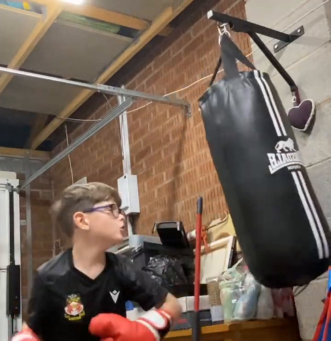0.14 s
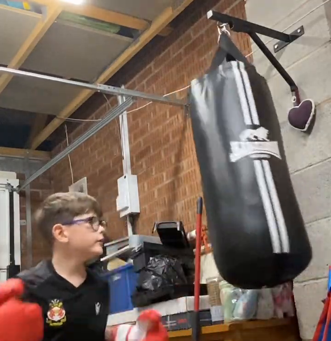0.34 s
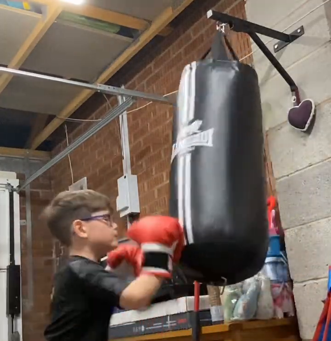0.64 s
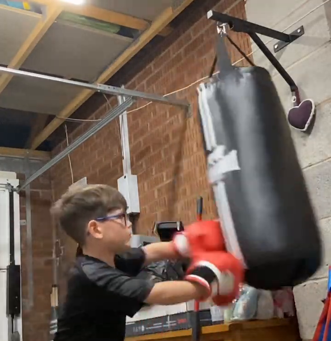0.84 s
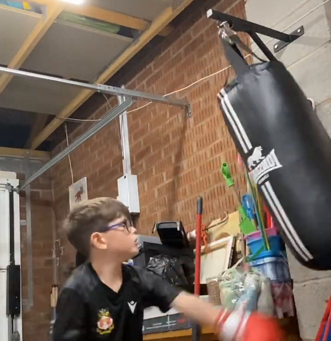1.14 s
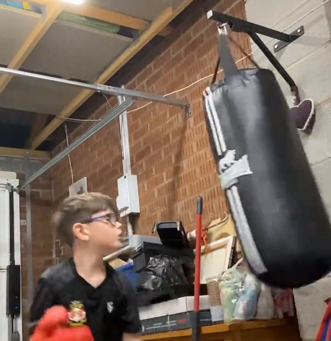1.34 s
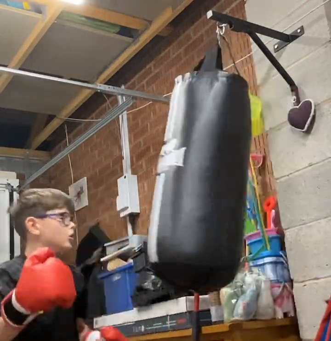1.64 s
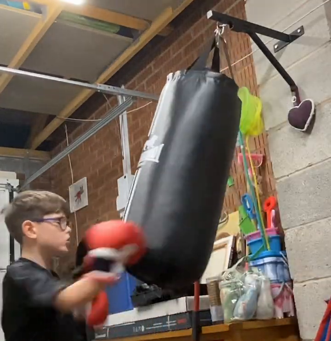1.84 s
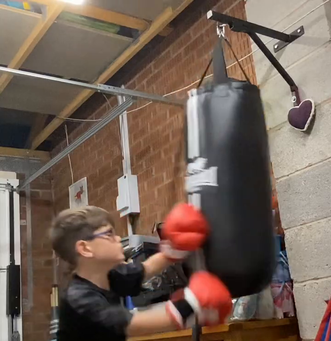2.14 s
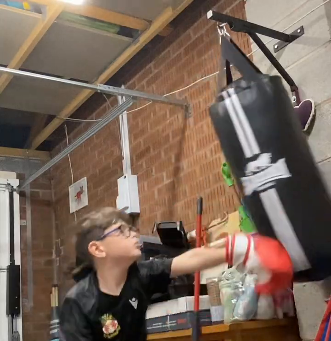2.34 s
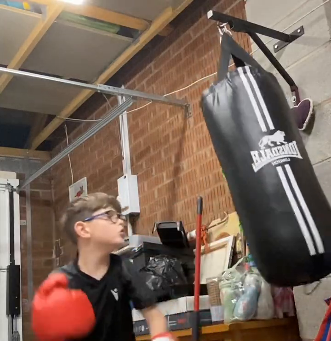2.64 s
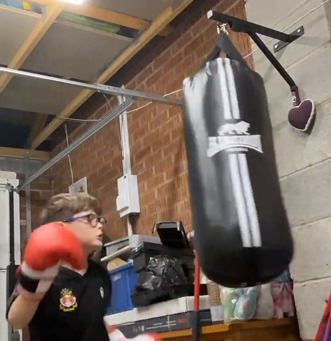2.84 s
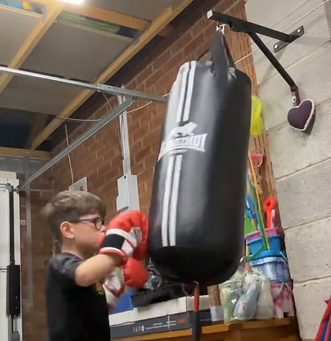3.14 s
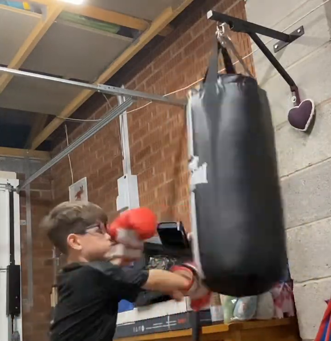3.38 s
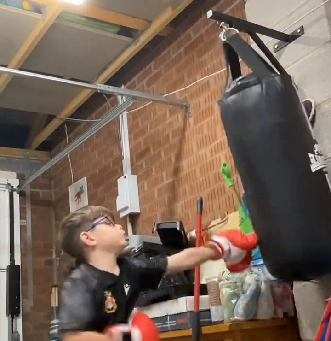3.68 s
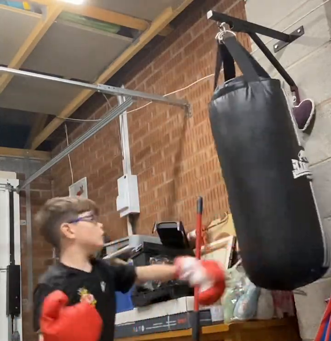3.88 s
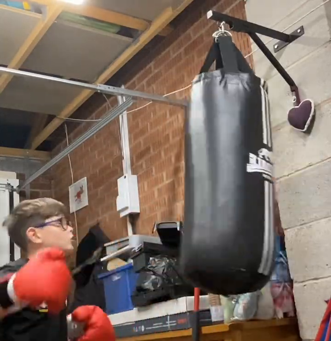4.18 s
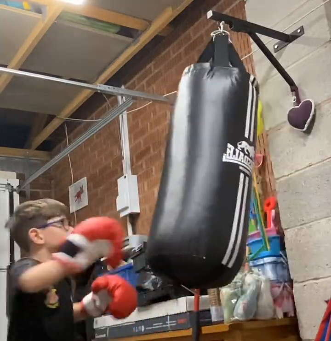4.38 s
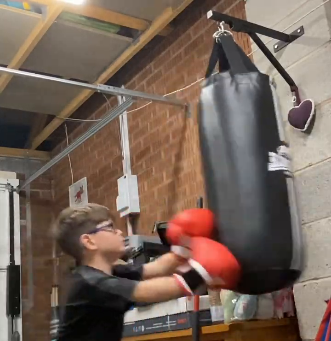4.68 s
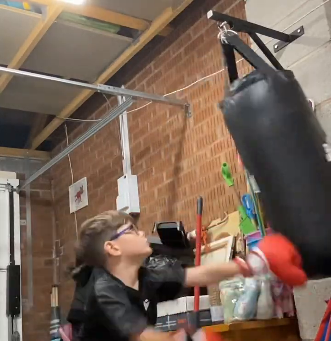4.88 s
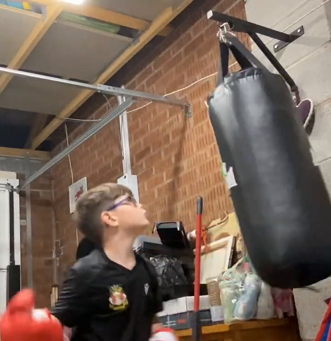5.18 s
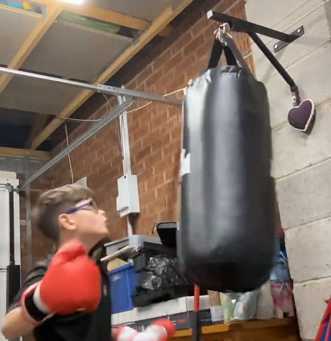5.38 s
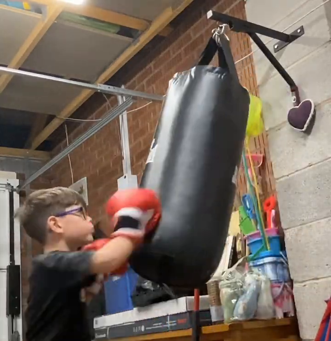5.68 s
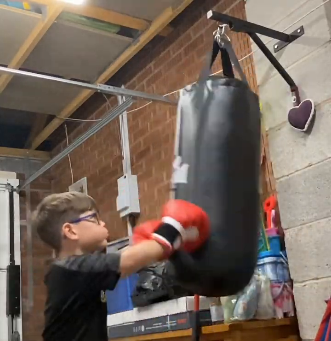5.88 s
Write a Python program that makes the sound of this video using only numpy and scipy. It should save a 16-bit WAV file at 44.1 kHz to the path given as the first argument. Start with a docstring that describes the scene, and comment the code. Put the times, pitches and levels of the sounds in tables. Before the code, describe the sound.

A repeating cycle of about 1.25 seconds: one or two quick glove slaps, a harder padded smack with a short steel squeal, then a loud jangle of rings and a low wall-bracket thump as the bag falls back and rebounds. Between bursts come tiny hook squeaks, sleeve swishes and glove rubs on vinyl. Quiet garage air, lively brick-room echoes, close microphone with little deep bass.

```python
"""A heavy bag hangs in a brick garage and takes quick bursts of gloved punches that slap its cover.
Slaps, thuds and cracks are shaped noise bursts, with damped modes for the knock of the taut cover.
The steel hook squeaks (gliding tones) as the bag swings; its rings jangle (struck modes) when it jumps.
The wall bracket booms (low damped modes) when the weight drops back, and sleeves, gloves and shoes
rustle in between (grainy noise). Dense echoes and quiet air surround it; the microphone sheds deep bass."""
import sys
import numpy as np
from scipy import signal
from scipy.io import wavfile
from scipy.ndimage import uniform_filter1d

SR = 44100
rng = np.random.default_rng(int(sys.argv[2]) if len(sys.argv) > 2 else 0)


def master_out(mix):
    """Clip the mix to full scale and print it as 16-bit PCM to the path in sys.argv[1]."""
    frames = np.transpose(np.atleast_2d(mix))
    ceiling = np.clip(frames, -1, 1)
    pcm = np.round(ceiling * 32767).astype(np.int16)
    wavfile.write(sys.argv[1], SR, pcm)


N = 265482
T = np.arange(SR // 2) / SR  # the life of one blow [s]
# Levels in the event tables come before each layer's own trim; spectra and modes give relative levels.


def amp(db):
    """Decibels to gain."""
    return 10 ** (np.asarray(db) / 20)


def unit(x):
    """Scales to rms 1."""
    return x / np.sqrt(np.mean(x ** 2) + 1e-20)


def crest(x, size=176):
    """Scales a blow so that its loudest 4 ms (size in samples) have rms 1."""
    loudest_power = uniform_filter1d(x ** 2, size, mode="constant").max()
    return x / np.sqrt(loudest_power + 1e-20)


def read(points, hz):
    """Reads a table on a log-frequency axis."""
    table_hz, value = np.transpose(points)
    return np.interp(np.log(hz + 1), np.log(table_hz), value)


def between(first, last, share):
    """Goes from first to last as share goes from 0 to 1, and on beyond."""
    return first + (last - first) * share


def add(mix, s, sound):
    """Mixes a sound in at s seconds."""
    part = mix[max(round(s * SR), 0):][:len(sound)]
    part += sound[:len(part)]


def colour(x, points, tilt_db=0, size=4096):
    """Minimum-phase filter with the given spectrum, tilted around 4 kHz in dB per octave above 500 Hz."""
    hz = abs(np.fft.fftfreq(size, 1 / SR))
    octaves = np.log2(np.maximum(hz, 500) / 4000)
    log_gain = np.log(amp(read(points, hz) + tilt_db * octaves))
    taps = np.fft.ifft(np.exp(np.conj(signal.hilbert(log_gain)))).real
    return signal.fftconvolve(x, taps)[:len(x)]


def wander(count, hz):
    """Straight lines between normal random knots, hz knots a second."""
    knots = rng.standard_normal(count)
    return np.interp(np.arange(count) * hz / SR, np.arange(count), knots)


def ringing(modes, spread):
    """Damped modes, one a row, each a little detuned by the load of the moment."""
    hz, db, t60 = np.transpose(modes)[:, :, None]
    hz = hz * (1 + spread * rng.standard_normal(hz.shape))
    t = T[:len(T) * 2 // 3]
    return amp(db - 60 * t / t60) * np.sin(2 * np.pi * hz * t)


# spectrum of the quiet garage air: (frequency [Hz], level [dB])
AIR_SPECTRUM = [(25, -41.5), (50, 2), (95, 7.5), (160, 2), (400, -1), (800, -5), (1600, -10), (4000, -16.5),
                (7000, -18.5), (10000, -26), (16000, -41)]


def garage_air(level_db=-56):
    """The quiet air of the garage: steady coloured noise."""
    return amp(level_db) * unit(colour(rng.standard_normal(N), AIR_SPECTRUM))


# hard punches lifting the bag: (time [s], rings level [dB], time to go slack [s], squeal length [s],
# squeal level [dB], mean pitch [Hz], glide [Hz], overtones re the tone [dB], lead-in [s])
LIFTS = [(1.057, -22, 0.055, 0.035, -23.5, 1959, -16, -2, 0.066),
         (2.389, -26.5, 0.04, 0.023, -28, 2004, 25, -25, 0.021),
         (3.645, -23, .048, 0.0204, -21.5, 1910, 337, -9, 0.028),
         (4.895, -21.5, 0.049, 0.036, -18.5, 1977, -32, -3.5, 0.071)]
# the bag dropping back on its straps: (time [s], clash level [dB], clash decay [s], gathering level [dB],
# boom level [dB], boom lag [s], bounce time [s], rebound level [dB])
DROPS = [(0.001, -37, 0.011, -54, -39, 0.0044, 0.13, -52), (1.211, -21.5, 0.014, -29, -36, .012, .124, -31),
         (2.516, -28, 0.0051, -32.5, -30, .006, .109, -34), (3.755, -25, 0.022, -35, -30.5, .031, .12, -55),
         (5.045, -14.5, .012, -27, -24.5, 0.019, .132, -35.5)]


def clashes():
    """Rings shiver and slacken on a lift; gather, clash, rebound on a drop: (s, dB, decay s, dB/octave)."""
    for s, db, slack, length, squeal_db, *tone in LIFTS:
        yield s + 0.008, squeal_db - 6.5, 0.022, -4.5  # shiver during the squeal
        yield s + slack, db, 0.013, -3.5  # the straps go slack and the rings clash
    for s, db, decay, gather_db, boom_db, lag, bounce, rebound_db in DROPS:
        yield s - 0.029, gather_db, 0.021, -6  # the rings draw together just before the drop
        yield s, db, decay, -6
        yield s + 0.64 * bounce, rebound_db - 1, 0.0098, -6  # first rebound
        yield s + bounce, rebound_db, 0.0098, -6


# ringing of the rings and hook: (frequency [Hz], level [dB], t60 [s])
STEEL_MODES = [(2967, -16.5, 0.42), (3550, -1, 0.065), (4100, -24.5, .12), (4820, -16.5, 0.089),
               (5400, -10, 0.32), (5900, -16, 0.1), (6100, -12, 0.14), (6100, -23, .13),
               (6280, -6.5, 0.071), (6940, -5, 0.16), (7040, -9, 0.027), (6760, 1.5, 0.096),
               (7500, -16.5, 0.13), (7530, 0, 0.085), (8530, -10.5, 0.12), (9000, -22.5, 0.067),
               (9400, -0.5, 0.084), (8900, -2, 0.093), (10500, -2.5, 0.07), (10650, -14, 0.029),
               (13600, -30.5, .06)]
# spectrum of the bare steel contacts: (frequency [Hz], level [dB])
CLASH_SPECTRUM = [(200, -25.5), (1000, -19), (2200, -14.5), (3500, -11), (4700, -11), (6500, 7), (9000, -3),
                  (12000, 2.5), (16000, -7)]


def jangles(level_db=-2, ring_db=-5, contacts_per_s=1300, scrape=.14, rise_share=0.27):
    """Each clash is a run of steel contacts; the weights of the modes they ring change at each clash."""
    out = np.zeros(N)
    for s, level, decay, tilt in clashes():
        hits = rng.random(len(T)) < contacts_per_s / SR
        contacts = rng.standard_normal(len(T)) * (scrape + hits)
        contacts *= np.exp(-T / decay) * (1 - np.exp(-T / (rise_share * decay)))
        weights = rng.choice([-1, 1], len(STEEL_MODES)) * rng.uniform(0.336, 1, len(STEEL_MODES))
        ring = signal.fftconvolve(contacts, weights @ ringing(STEEL_MODES, spread=0.0035))[:len(T)]
        clatter = crest(colour(contacts, CLASH_SPECTRUM, tilt))
        add(out, s, amp(level + level_db) * crest(clatter + amp(ring_db) * crest(ring)))
    return out


# gloves landing: (time [s], slap level [dB], follow-through [0 flick, about 1 full; more is deeper],
# squareness of the first contact [0-1])
PUNCHES = [(0.598, -30.5, 0.1, 0.85), (0.752, -42.5, 0.3, 0.17), (1.046, -29.5, .95, 0.13),
           (1.851, -39.5, 0.3, 0), (2.090, -36.5, 0.1, 0.12), (2.359, -30.5, 0.85, 0.06),
           (3.0931, -43.5, 0.04, 0.65), (3.489, -48.5, 1.17, 0.3), (3.505, -38.5, 0, 0.11),
           (3.627, -28.5, 0.81, 0), (4.43, -35.5, 0.36, 0.7), (4.882, -28, .85, 0.16),
           (5.664, -39, 0.28, 0.9), (6.010, -41.5, 0.86, .95)]


def blows():
    """Gloves, landings and rebounds: (s, slap dB, thud and crack dB re the slap, squareness)."""
    for s, db, follow, square in PUNCHES:
        yield s, db, between(-30.5, -4, follow), between(1.5, -9, follow), square
    for s, clash_db, decay, gather_db, boom_db, lag, bounce, rebound_db in DROPS:
        db = boom_db - 2  # the filling settles: slap follows the boom, thud and crack follow the clash
        yield s, db, clash_db - 15 - db, clash_db - 5.5 - db, 0.12
        yield s + bounce, rebound_db - 10.5, between(-30.5, -4, 0.53), between(1.5, -9, 0.4), 0


def burst(decay, tick, rise):
    """A first contact followed by a dying crush of small ones (decay and rise in s)."""
    crush = rng.standard_normal(len(T)) * np.exp(-T / decay) * (1 - np.exp(-T / rise))
    crush /= np.linalg.norm(crush)
    crush[0] += tick
    return crush


# the taut cover and the glove's cushion of air: (frequency [Hz], level [dB], t60 [s])
KNOCK_MODES = [(320, 6, 0.021), (432.3, 0, 0.052), (637, -7, 0.073), (910, 0, 0.031)]
# spectra of the cover's slap, the filling's thud and the crack: (frequency [Hz], level [dB])
SLAP_SPECTRUM = [(100, -12), (250, -11.5), (420, 1.5), (650, 2.5), (850, -5), (1400, -5), (3000, -6),
                 (6000, -27.5), (16000, -50)]
THUD_SPECTRUM = [(25, -47), (45, -27), (75, 0), (140, -8.5), (250, -9), (600, -29), (2000, -57.5)]
CRACK_SPECTRUM = [(500, -52), (2500, -0.5), (6000, 11), (10000, 7.5), (16000, -4)]


def punches(slap_db=-3, knock_db=-2, thud_db=-3, crack_db=-4):
    """Padding slaps the cover, which knocks and cracks; the filling gives way with a dull thud."""
    out = np.zeros(N)
    for s, db, thud_re_slap, crack_re_slap, square in blows():
        knock = ringing(KNOCK_MODES, spread=0.073).sum(0)
        firmness = max(square, .05)
        knock *= 1 - np.exp(-T[:len(knock)] * firmness / 0.00056)  # a glancing blow builds up more slowly
        slap = colour(burst(decay=0.0064, tick=0.82 * square, rise=0.00084), SLAP_SPECTRUM)
        thud = colour(burst(decay=0.036, tick=0.8 * square, rise=0.0042), THUD_SPECTRUM)
        crack = colour(burst(decay=0.0057, tick=0.74 * square, rise=0.0063), CRACK_SPECTRUM)
        add(out, s, amp(db + knock_db) * np.sqrt(firmness) * crest(knock))
        add(out, s, amp(db + slap_db) * crest(slap))
        add(out, s, amp(db + thud_re_slap + thud_db) * crest(thud))
        add(out, s, amp(db + crack_re_slap + crack_db) * crest(crack))
    return out


# soft low thumps between blows, probably footfalls: (time [s], level [dB])
FOOTFALLS = [(3.068, -47), (4.086, -49)]


def thumps():
    """Footfalls, and the pull of every punch, drop and rebound on the bracket through the straps: (s, dB)."""
    yield from FOOTFALLS
    for s, db, follow, square in PUNCHES:
        yield s + 0.01794, db + between(-23.5, -3, follow)  # lag from the glove to the bracket
    for s, clash_db, decay, gather_db, boom_db, lag, bounce, rebound_db in DROPS:
        yield s + lag, boom_db
        yield s + bounce, rebound_db - 9.5


# the loaded bracket and wall: (frequency [Hz], level [dB], t60 [s])
BRACKET_MODES = [(82.5, -13.5, 0.13), (119.6, -1, 0.26), (164, -5.5, 0.18), (209, -19.5, 0.3),
                 (314, -36, 0.18)]


def booms(rise_s=0.0026):
    """Straps snap taut and the bracket booms in low damped modes, which also voice the soft footfalls."""
    out = np.zeros(N)
    for s, level in thumps():
        boom = ringing(BRACKET_MODES, spread=0.067).sum(0)
        add(out, s, amp(level) * boom * (1 - np.exp(-T[:len(boom)] / rise_s)))
    return out


# the hanger slipping as the bag swings: (time [s], length [s], level [dB], mean pitch [Hz], glide [Hz],
# overtones re the tone [dB])
SQUEAKS = [(0.456, 0.022, -44, 1635, -8, -6.5), (1.207, 0.015, -20, 1877, 380, -6),
           (1.22, .021, -40, 1951, -82, 11), (1.29, 0.019, -39, 1917, -70, -8),
           (1.425, 0.023, -51, 1653, -180, -23), (1.539, 0.035, -49.5, 1675, -29, -26),
           (1.563, 0.051, -44, 1676, 42, -18.5), (1.778, 0.032, -51.5, 1680, -100, -12.5),
           (1.873, 0.021, -46.5, 1703, -20, -22), (2.203, 0.034, -49.5, 1914, -140, -37),
           (2.849, 0.053, -35.5, 2033, -18, -27), (2.851, 0.06, -45.5, 1683, -105, -9),
           (2.859, 0.029, -34, 3620, 68, -42), (3.502, 0.033, -39.5, 1685, -37, -12),
           (3.561, 0.076, -42.5, 1746, 88, -7.5), (4.355, .022, -39, 1760, -138, -34),
           (4.386, 0.025, -38.5, 1726, -13, -8.5), (5.373, 0.024, -37, 1694, -190, -7.5)]


def slips(creep_below_hz=1800, creep_gap_s=.058, creep_length_s=0.031, creep_hz=1653):
    """Lifts wind up to squeals; swings squeak, low ones creep on: (s, length s, dB, Hz, Hz, overtones dB)."""
    for s, rings_db, slack, length, db, hz, glide, bright_db, lead in LIFTS:
        first_hz = hz - glide / 2
        # the hook starts to slip softly, its pitch climbing towards the squeal
        yield s - lead, lead * 0.95, db - 16, first_hz * .935, first_hz * 0.99, -22
        yield s, length, db, first_hz, first_hz + glide, bright_db
    for s, length, db, hz, glide, bright_db in SQUEAKS:
        yield s, length, db, hz - glide / 2, hz + glide / 2, bright_db
        if hz < creep_below_hz:  # only a lightly loaded hook slips once more, weakly
            creep_db = min(db - 11, -48)
            yield s + length + creep_gap_s, creep_length_s, creep_db, creep_hz, creep_hz, bright_db


# how the hook passes overtones: (frequency [Hz], level [dB])
HOOK_RESPONSE = [(1500, -12), (3500, -5.5), (4000, -10), (4900, -13), (5950, 3.5), (6700, -6), (8000, -7.5),
                 (10000, -9), (12000, -24), (16000, -20.5)]
# spectrum of the dry scrape: (frequency [Hz], level [dB])
SCRAPE_SPECTRUM = [(300, -1.5), (1200, -10.5), (1850, 11), (2500, -4), (3600, 3.5), (4600, -8), (6500, 3),
                   (10000, -1.5), (13000, -8), (16000, -12)]


def squeaks(level_db=1, jitter=0.015, jitter_hz=1400, flutter_db=3.0, scatter_db=4, scrape_db=-13.5):
    """Steel sticks and slips on steel: an unsteady chirp with fluttering overtones and a dry scrape."""
    out = np.zeros(N)
    for s, length, db, first_hz, last_hz, bright_db in slips():
        n = int(length * SR)
        hz = np.linspace(first_hz, last_hz, n) * (1 + jitter * wander(n, jitter_hz))
        phase = 2 * np.pi * np.cumsum(hz) / SR
        upper = np.zeros(n)
        for k in range(2, 8):
            if k * first_hz < SR / 2:
                flutter = unit(amp(scatter_db * wander(n, hz=426)))
                upper += amp(read(HOOK_RESPONSE, k * first_hz)) * flutter * np.sin(k * phase)
        rasp = rng.standard_normal(n) * (1 + np.cos(phase))  # a rasp at every slip
        scrape = unit(colour(rasp, SCRAPE_SPECTRUM))
        grip = signal.windows.tukey(n, 0.25) * amp(flutter_db * wander(n, hz=245))
        bite = unit(np.sin(np.linspace(0, 2.4, n)))  # the slips sharpen as the squeak takes hold
        edge = bite * (amp(bright_db) * upper + amp(scrape_db) * scrape)
        add(out, s, amp(db + level_db) * grip * (np.sin(phase) + edge))
    return out


# sleeves, gloves and shoes brushing: (time of the crest [s], half width [s], level [dB])
BRUSHES = [(0.682, 0.02, -53), (0.759, 0.02, -48.5), (0.872, .015, -44), (0.928, 0.019, -42.5),
           (1.919, 0.037, -48), (2.155, 0.021, -47.5), (2.265, 0.038, -47.5), (2.78, 0.023, -55),
           (3.05, 0.0091, -54), (3.38, 0.06, -54.5), (4.048, 0.0078, -47.5), (4.134, 0.01, -43.5),
           (4.161, .04, -53.5), (4.649, 0.0058, -50), (4.704, .03, -47.5), (4.761, .036, -46),
           (5.722, 0.017, -42.5), (5.84, 0.034, -52), (5.97, 0.048, -51.5)]


def rubs(count=8):
    """Clear swishes, and faint fidgeting at random moments: (s, half width s, dB, tilt dB/octave)."""
    fidgets = [(s, 0.027, -60) for s in rng.uniform(0, N / SR, count)]
    # a quicker stroke is brighter: the tilt rises with the level
    return [(s, width, db, -1 + 0.094 * (db + 50)) for s, width, db in BRUSHES + fidgets]


def strokes(rows, spectrum, level_db, grain_db, grain_hz):
    """Short rubs: a grainy run of slips that swells and fades, coloured by the material."""
    out = np.zeros(N)
    for s, width, db, tilt in rows:
        t = np.arange(-3 * width, 3 * width, 1 / SR)
        grains = rng.standard_normal(len(t)) * amp(grain_db * wander(len(t), grain_hz))
        swell = np.exp(-(t / width) ** 2 / 2)
        add(out, s + t[0], amp(db + level_db) * unit(colour(grains, spectrum, tilt)) * swell)
    return out


# a glove sliding over the vinyl cover, and the straps creaking at the end of a swing:
# (time of the crest [s], half width [s], level [dB], treble tilt [dB per octave])
GLOVE_SLIDES = [(2.04, 0.043, -42.5, -3), (2.105, 0.023, -40, -2), (3.44, 0.011, -35, -2)]
STRAP_CREAKS = [(1.80, 0.038, -48.5, -6.5), (1.875, 0.022, -46.5, -5)]
# spectra of cloth, vinyl and straps: (frequency [Hz], level [dB])
CLOTH_SPECTRUM = [(60, -7.5), (200, 4), (700, 5), (1500, 4.5), (3000, 2.5), (6500, 1), (10000, 0),
                  (16000, -10.5)]
VINYL_SPECTRUM = [(300, -38), (1500, -11), (3000, -6), (4200, -2), (5600, 4.5), (6800, 3), (8000, -4),
                  (11000, -3), (16000, -13)]
STRAP_SPECTRUM = [(150, -14.5), (230, -10), (330, -16), (510, -11.5), (590, -8), (690, -3), (820, -20),
                  (1400, -13), (4000, -19.5)]


def swishes():
    """Cloth rustles, gloves hiss over the vinyl, and the straps groan."""
    cloth = strokes(rubs(), CLOTH_SPECTRUM, level_db=-1.0, grain_db=2.0, grain_hz=918)
    vinyl = strokes(GLOVE_SLIDES, VINYL_SPECTRUM, level_db=-6.5, grain_db=-4, grain_hz=1170)
    straps = strokes(STRAP_CREAKS, STRAP_SPECTRUM, level_db=-1.5, grain_db=8, grain_hz=308.0)
    return cloth + vinyl + straps


# dying away of the echoes in the garage: (frequency [Hz], t60 [s])
GARAGE_DECAY = [(80, 0.51), (260, 0.68), (700, 0.36), (1200, 0.36), (2000, 0.32), (5000, 0.31),
                (9000, 0.24), (15000, 0.22)]


def garage(x, gap_s=0.0036, swing_s=1.232, early_db=3, early_s=0.053, echoes_per_s=4000):
    """Brick walls and clutter: dense echoes dying band by band, whose pattern shifts as the bag swings."""
    out = np.zeros(N)
    swing = 2 * np.pi * np.arange(N) / SR / swing_s
    for share in (np.cos(swing / 2), np.sin(swing / 2)):
        present = (rng.random(len(T)) < echoes_per_s / SR) * (T > gap_s)
        taps = rng.choice([-1., 1.], len(T)) * present
        taps *= amp(early_db * np.exp(-(T / early_s) ** 2))  # the nearest walls answer loudest
        hz, t, bands = signal.stft(taps, SR, nperseg=256)
        bands = bands * amp(-60 * t / read(GARAGE_DECAY, hz)[:, None])
        tail = signal.istft(bands, SR, nperseg=256)[1]
        out += signal.fftconvolve(x * share, tail / np.linalg.norm(tail))[:N]
    return out


def scene(punch_room_db=-1, jangle_room_db=-4, squeak_room_db=-4, boom_room_db=-10, swish_room_db=-3):
    """All sources, direct and through the garage, over its quiet air."""
    sources = [(jangles(), jangle_room_db), (punches(), punch_room_db), (booms(), boom_room_db),
               (squeaks(), squeak_room_db), (swishes(), swish_room_db)]
    direct = sum(sound for sound, room_db in sources)
    echoes = garage(sum(amp(room_db) * sound for sound, room_db in sources))
    return (direct + echoes + garage_air())[None]


def suppress(x, depth_db=2.4, half_cut_db=5.83258):
    """Noise suppression: each band is turned down as it sinks towards its own quiet level."""
    bands = signal.stft(x, SR, nperseg=512, noverlap=384)[2]
    power = uniform_filter1d(uniform_filter1d(abs(bands) ** 2, size=25, axis=1), size=7, axis=2)
    power_db = 10 * np.log10(abs(power) + 1e-20)
    over_db = power_db - np.percentile(power_db, 12, axis=2, keepdims=True)
    bands = bands * amp(-depth_db / (1 + np.exp((over_db - half_cut_db) / 2)))
    return signal.istft(bands, SR, nperseg=512, noverlap=384)[1][:, :N]


def record(dry, low_hz=56, edge_hz=16200):
    """The microphone sheds deep bass, quiet tails are suppressed; then the band limit."""
    thinned = signal.sosfilt(signal.butter(4, low_hz, "high", fs=SR, output="sos"), dry)
    band_limit = signal.firwin(511, edge_hz, window=("kaiser", 9), fs=SR)
    return signal.oaconvolve(suppress(thinned), band_limit[None], "same")


dry = scene()
out = record(dry)
master_out(out)
```